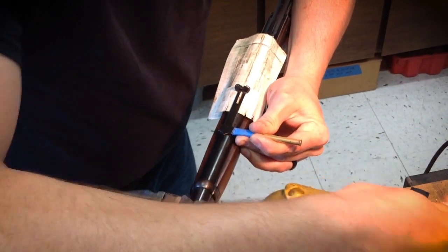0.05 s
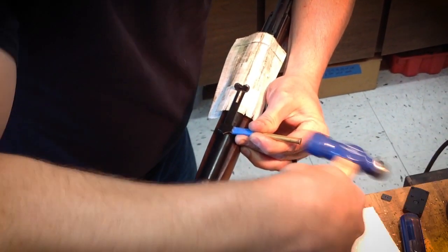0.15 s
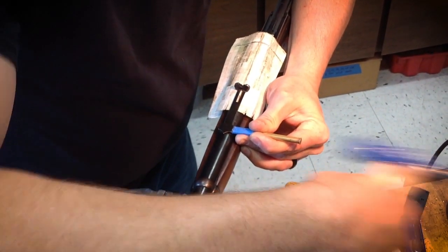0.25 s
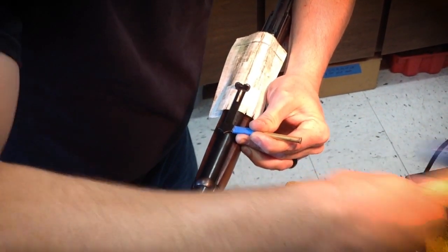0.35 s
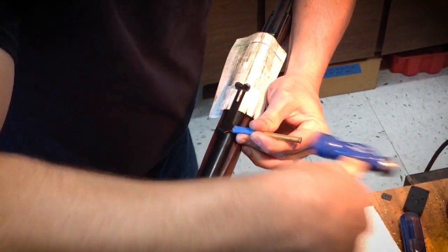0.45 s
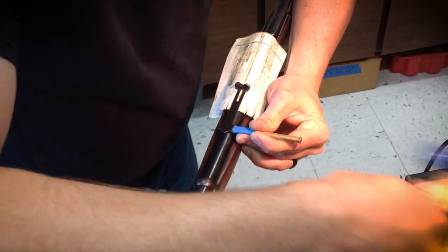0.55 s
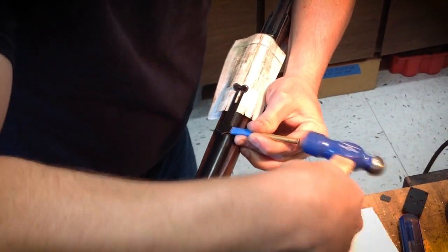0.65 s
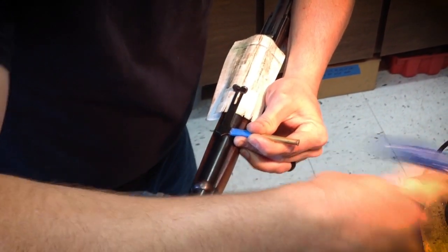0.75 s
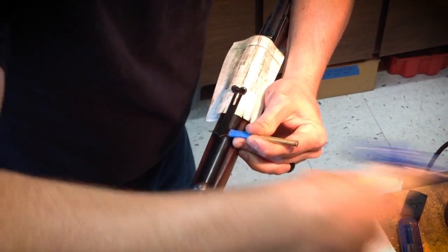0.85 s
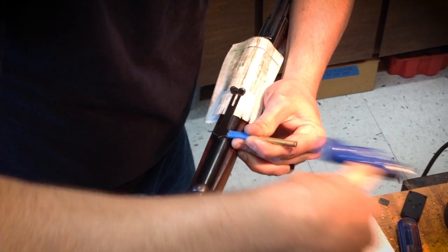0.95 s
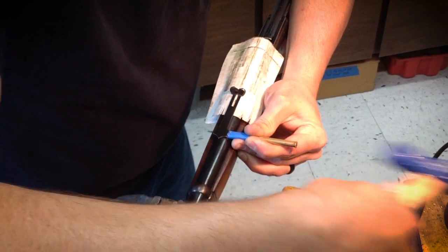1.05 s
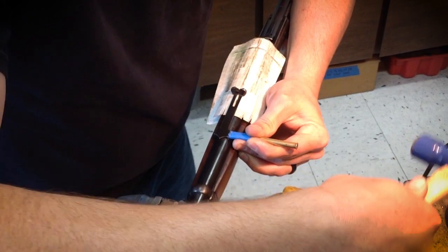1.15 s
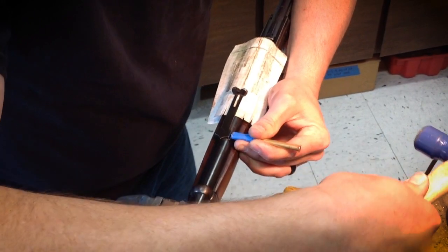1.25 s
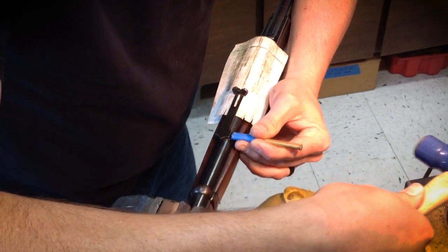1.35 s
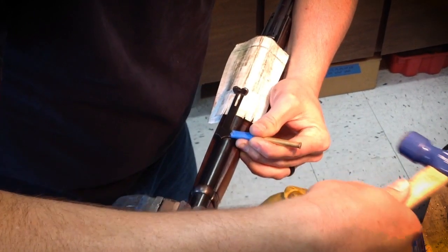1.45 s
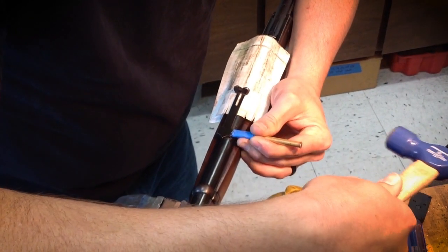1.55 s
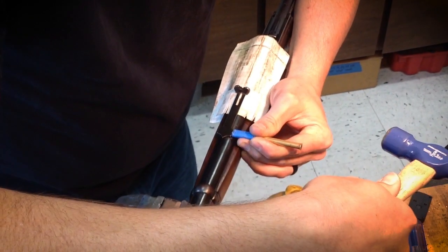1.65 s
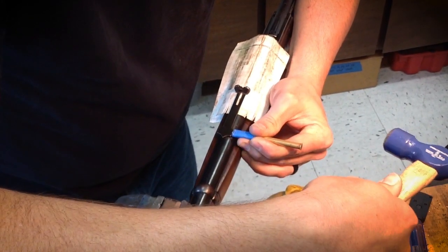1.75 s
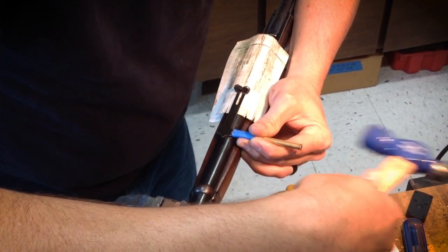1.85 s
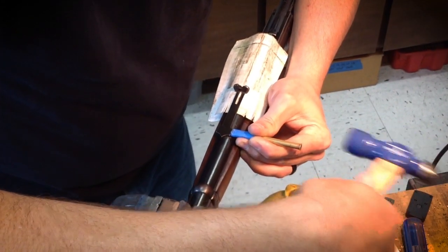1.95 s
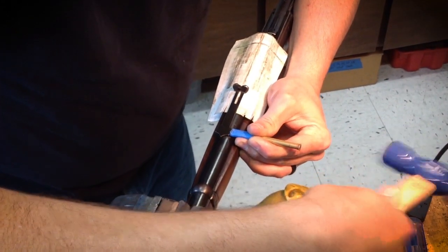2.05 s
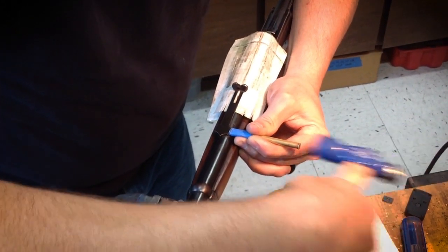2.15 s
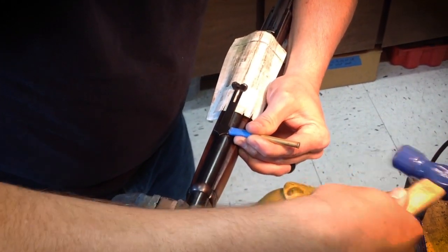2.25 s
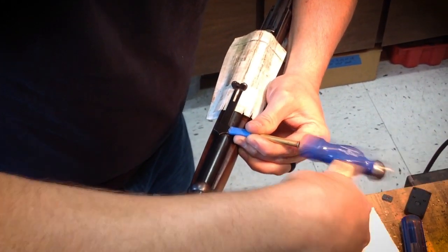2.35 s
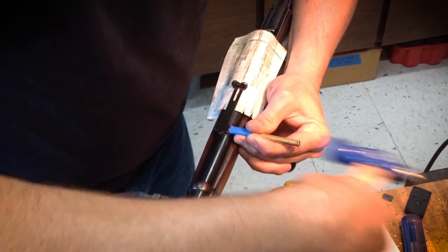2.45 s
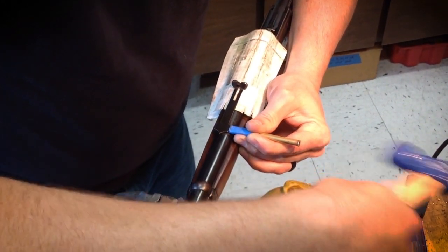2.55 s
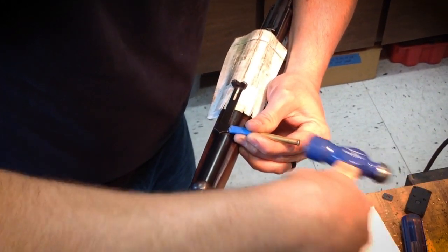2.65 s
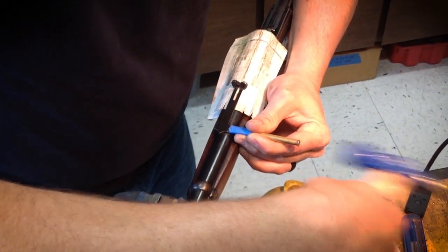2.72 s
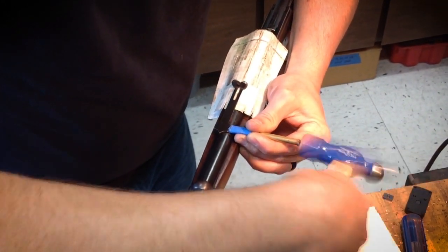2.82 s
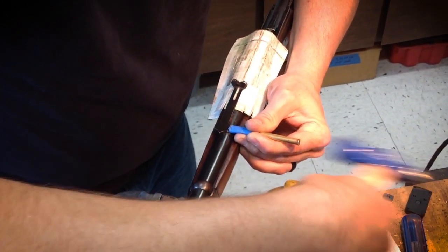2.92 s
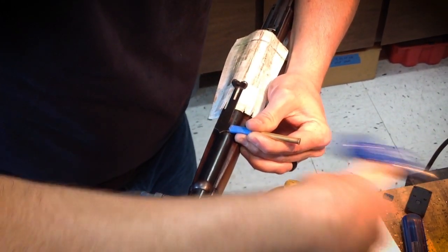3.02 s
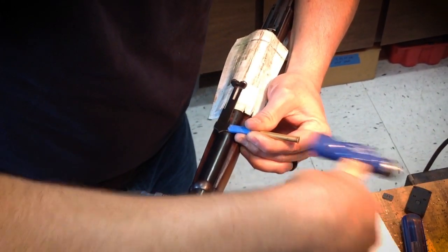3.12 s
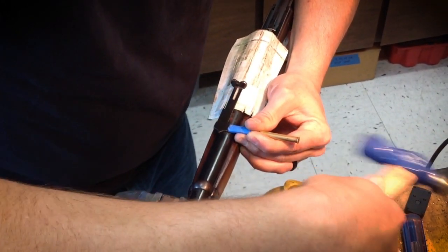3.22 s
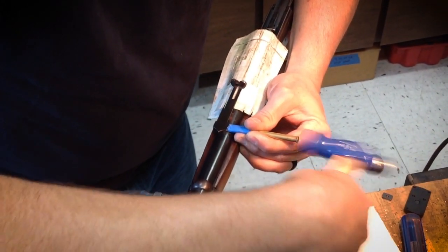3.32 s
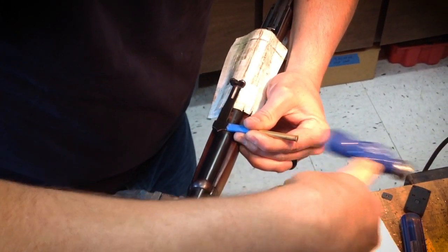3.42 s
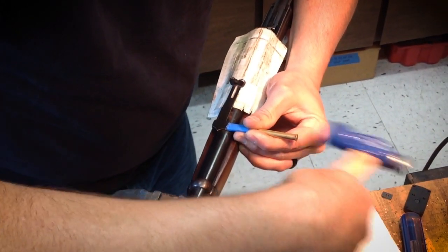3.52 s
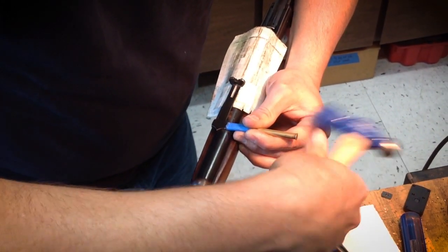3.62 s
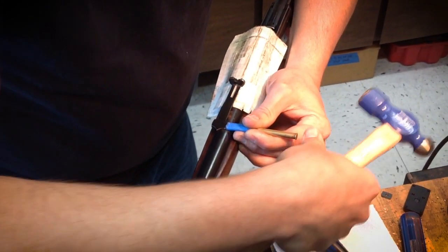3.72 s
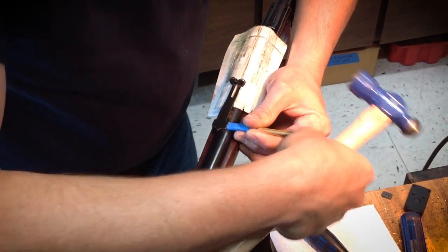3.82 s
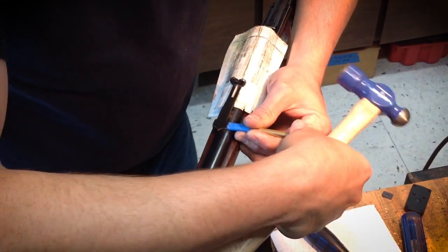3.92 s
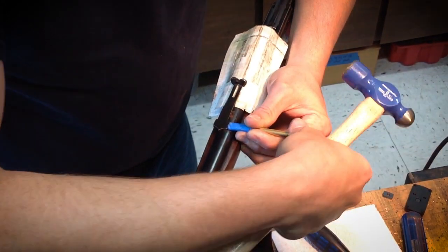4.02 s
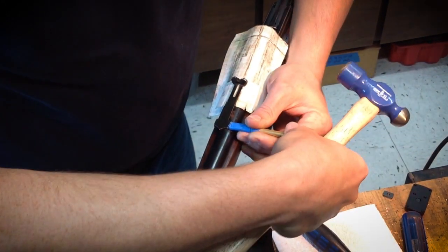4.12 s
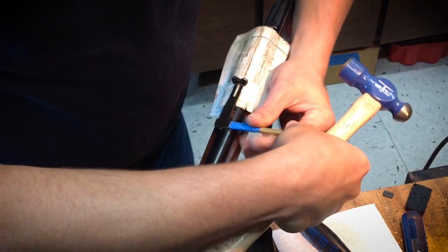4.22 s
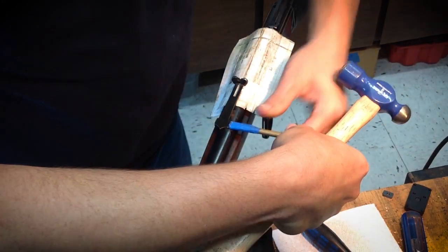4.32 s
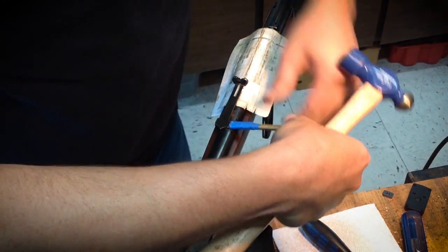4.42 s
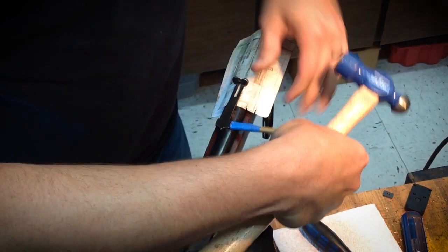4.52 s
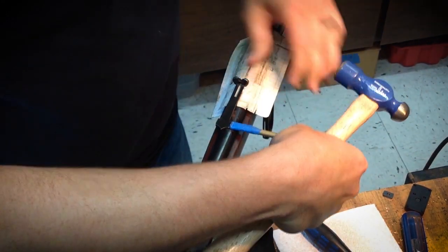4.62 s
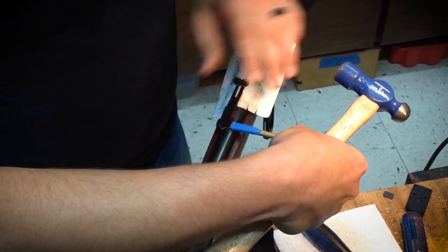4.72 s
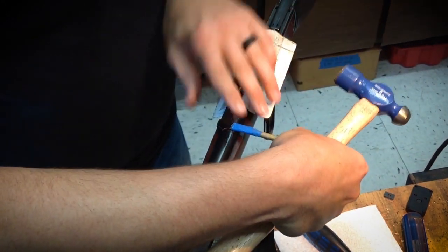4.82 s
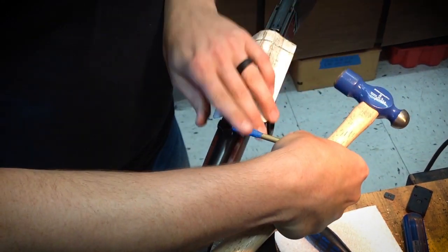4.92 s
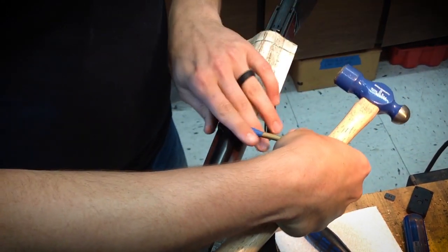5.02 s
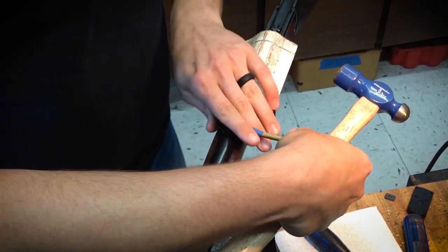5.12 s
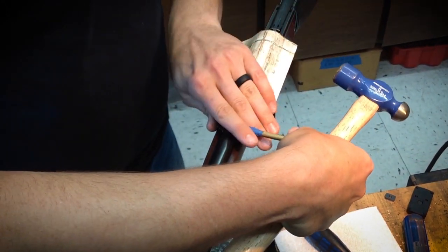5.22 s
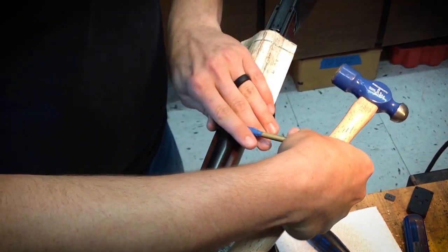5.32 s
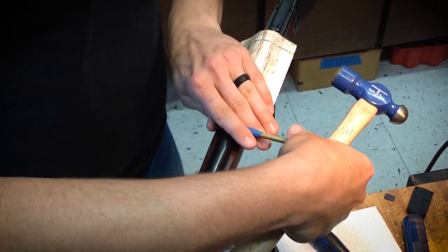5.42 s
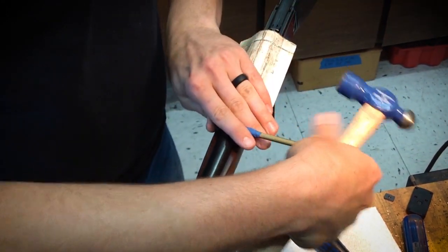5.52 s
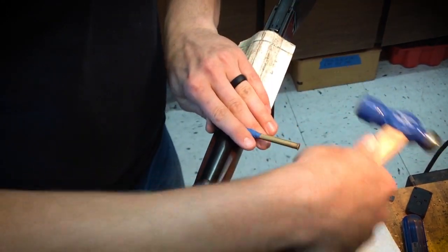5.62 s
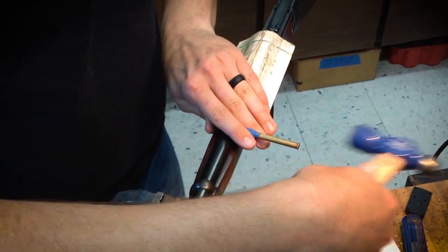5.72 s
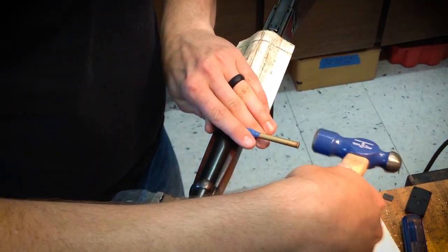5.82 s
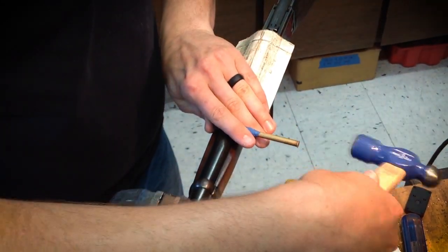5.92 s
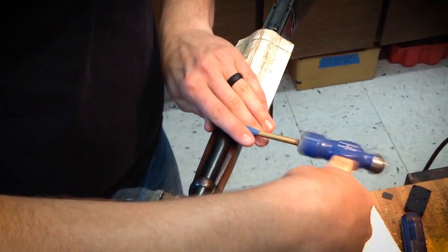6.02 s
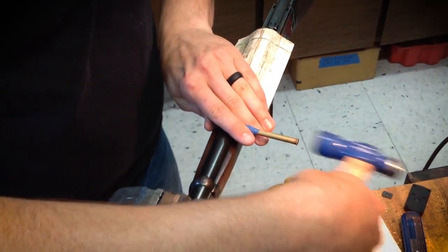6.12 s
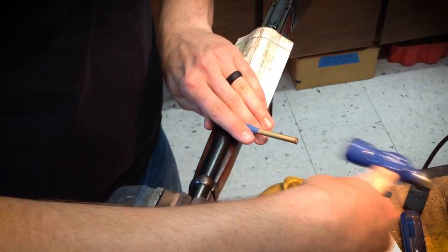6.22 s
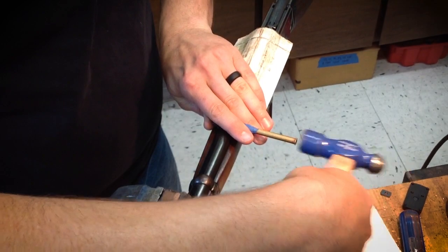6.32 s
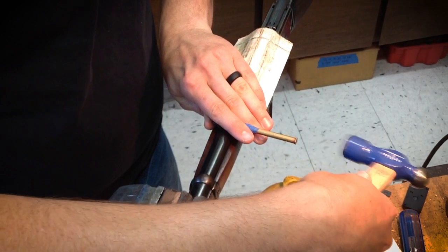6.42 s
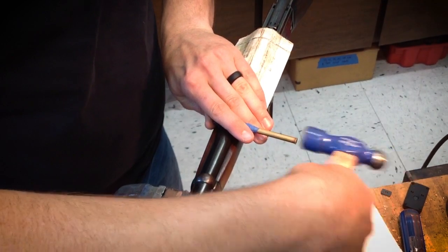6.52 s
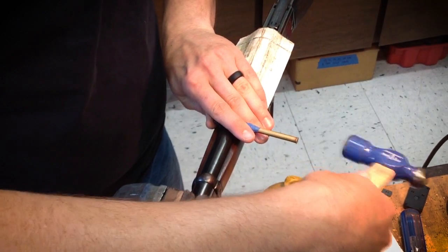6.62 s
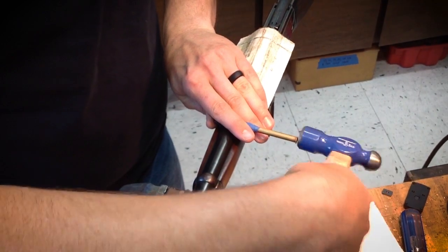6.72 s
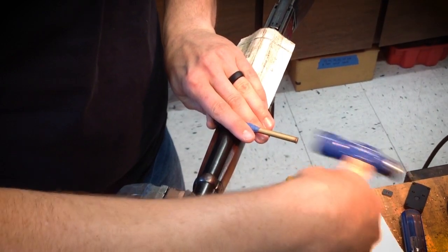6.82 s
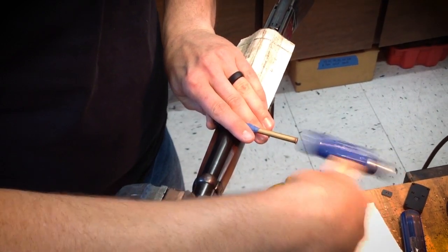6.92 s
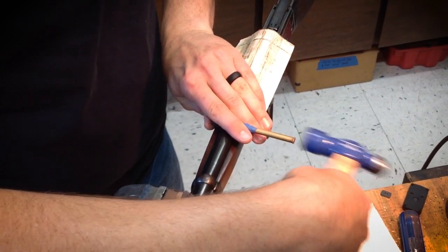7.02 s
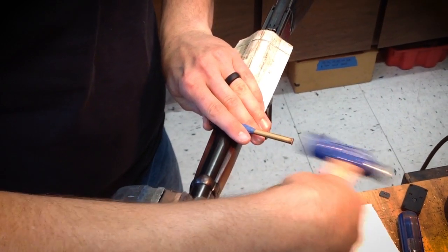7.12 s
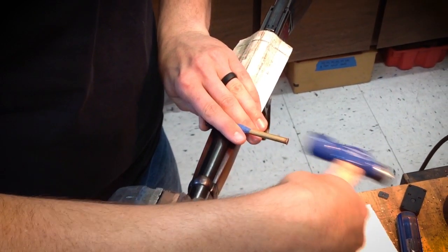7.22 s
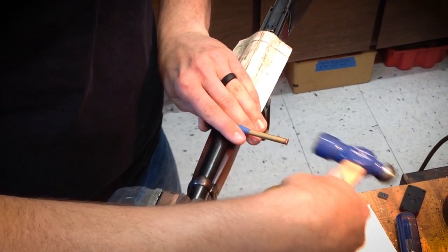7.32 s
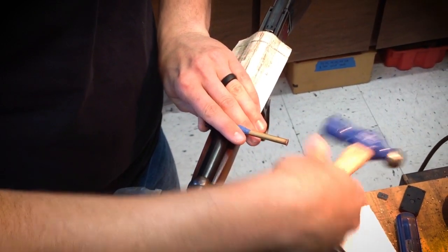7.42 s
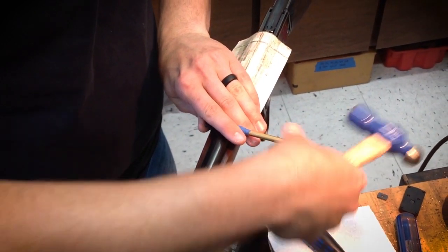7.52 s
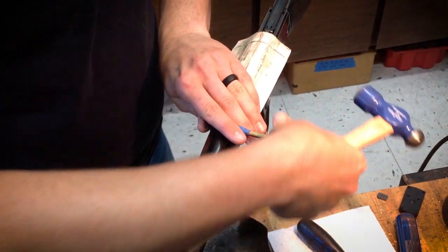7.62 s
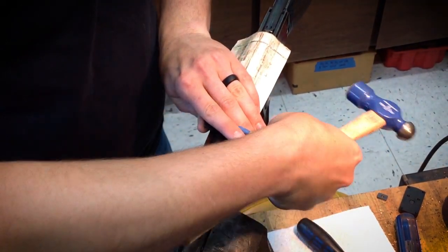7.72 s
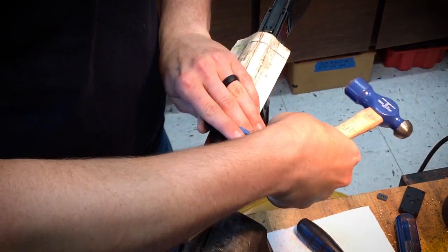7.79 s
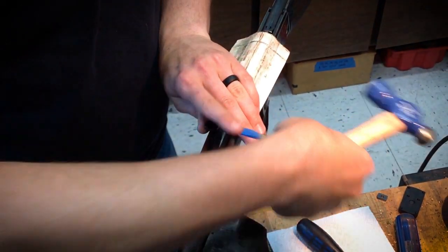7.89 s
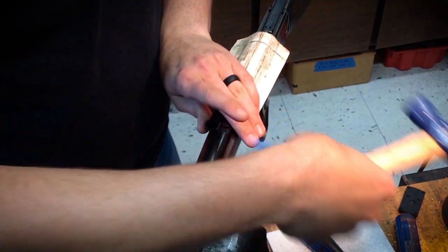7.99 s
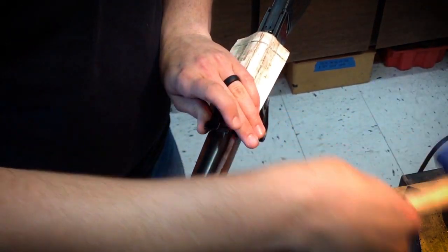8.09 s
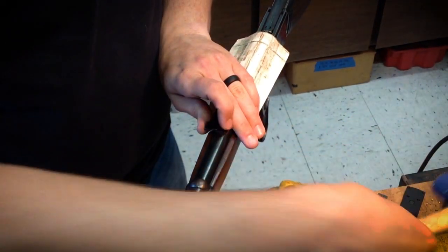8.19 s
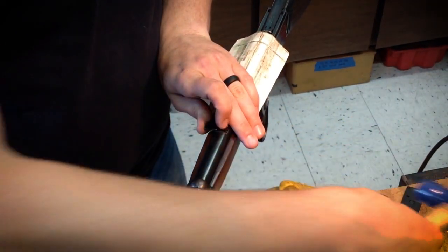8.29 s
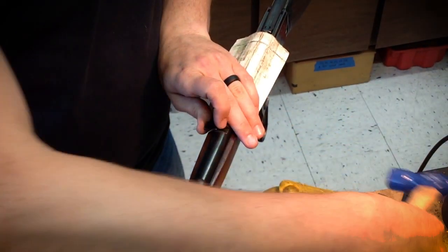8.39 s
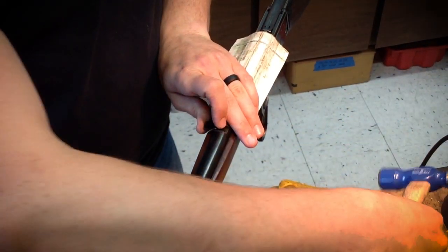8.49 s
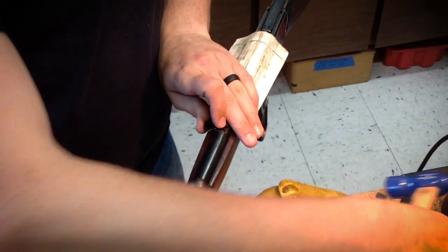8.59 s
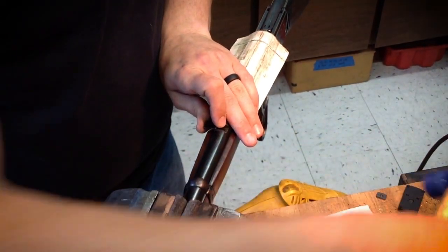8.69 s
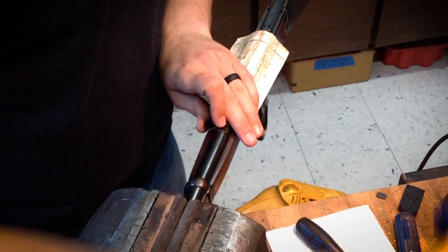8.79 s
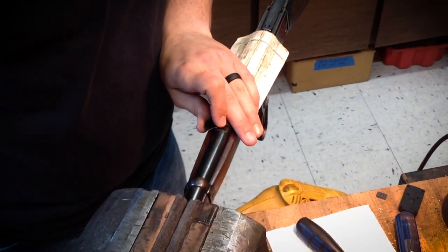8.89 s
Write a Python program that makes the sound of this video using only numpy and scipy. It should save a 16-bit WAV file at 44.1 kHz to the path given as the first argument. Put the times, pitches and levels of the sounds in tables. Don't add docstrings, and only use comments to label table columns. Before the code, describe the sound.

A hammer taps a metal punch in quick runs, four hard ringing cracks, then softer taps, clinks, gentler taps and a dull bench knock.

```python
import sys
import numpy as np
from scipy import signal
from scipy.fft import rfft, irfft, next_fast_len
from scipy.io import wavfile

SR = 44100
rng = np.random.default_rng(int(sys.argv[2]) if len(sys.argv) > 2 else 0)


def output_pcm(signal):
    pcm = np.clip(np.atleast_2d(signal).T, -1, 1) * 32767
    wavfile.write(sys.argv[1], SR, np.round(pcm).astype(np.int16))


def invert_db(x):
    u = np.asarray(x, float) / 20
    return 10 ** u


N = 394694
LEAD = SR // 10
FIRST_ECHO_S = 0.0014

# pitch_hz [Hz], t60_s [s]
ROOM_DECAY = [(100, 0.69), (260, 0.16), (700, 0.33), (1840, 0.26), (4850, 0.28), (12800, 0.18)]


def at_hz(points, hz):
    points_hz, values = np.transpose(points)
    return np.interp(np.log(hz + 1e-3), np.log(points_hz), values)


def coloured(spectrum):
    size = next_fast_len(N)
    shape = invert_db(at_hz(spectrum, np.fft.rfftfreq(size, 1 / SR)))
    x = irfft(rfft(rng.standard_normal(size)) * shape, size)[:N]
    return x / x.std()


def band_pass(x, low_hz, high_hz):
    return signal.sosfilt(signal.butter(2, [low_hz, high_hz], "band", fs=SR, output="sos"), x)


def cut_below(x, hz):
    return signal.sosfilt(signal.butter(2, hz, "high", fs=SR, output="sos"), x)


def ring_shape(hz, t60):
    t = np.arange(min(int(1.5 * t60 * SR), 2 * SR)) / SR
    return invert_db(-60 * t / t60) * np.sin(2 * np.pi * hz * t)


def strike(times, levels_db, modes, chatter_ms, spread_db, delay_ms=0.0):
    times = np.asarray(times)
    chatter_s = (chatter_ms * np.ones(len(times)) / 1000)[:, None]
    place = np.sort(rng.random((len(times), 6)), axis=1)
    place[:, 0] = 0
    contact_s = times[:, None] + delay_ms / 1000 + place * chatter_s
    at = np.round(contact_s * SR).astype(int) + LEAD
    out = np.zeros(N + 2 * LEAD + 2 * SR)
    for hz, mode_db, t60 in modes:
        share = invert_db(mode_db + spread_db * rng.standard_normal((len(times), 1)))
        contacts = rng.uniform(0.059, 1, place.shape) * (1 - 1.715 * place)
        contacts[:, 0] *= 0.6
        contacts[:, 1:] *= chatter_s > 0
        contacts /= np.sqrt(np.sum(contacts ** 2, axis=1, keepdims=True))
        forces = invert_db(levels_db)[:, None] * share * contacts
        shape = ring_shape(hz, t60)
        for i, force in zip(at.ravel(), forces.ravel()):
            if force:
                out[i:i + len(shape)] += force * shape
    return out[:N + 2 * LEAD]


def crack(times, levels_db, t60_ms, low_hz, high_hz):
    bursts = np.zeros(N + 2 * LEAD)
    t = np.arange(LEAD // 2) / SR
    swell = 1 - np.exp(-t / 0.0005)
    for s, db, ms in zip(times, levels_db, t60_ms * np.ones(len(times))):
        at = round(s * SR) + LEAD
        bursts[at:at + len(t)] += invert_db(db - 60000 * t / ms) * swell
    slips = band_pass(bursts * rng.standard_normal(len(bursts)), low_hz, high_hz)
    return slips * np.sqrt(SR / 2 / (high_hz - low_hz))


def background():
    # pitch_hz [Hz], level_db [dB per Hz]
    air = [(30, -5), (45, 1.5), (100, -5), (200, -12.5), (450, -14.5), (900, -19), (1400, -18), (2500, -24),
           (8600, -28.5), (11800, -31.5), (12300, -70)]
    # pitch_hz [Hz], level_db [dB rms]
    motors = [(52.5, -82.5), (89, -84.5), (124, -89)]
    # time_s [s], level_db [dB]
    shake = [(0.0, -50), (0.62, -42.5), (0.74, -55.5), (0.87, -36.5), (2.09, -48.5), (2.79, -41.5),
             (4.49, -53.5), (4.91, -45), (5.33, -50.5), (5.38, -45.5), (8.82, -46.5), (8.95, -47)]
    # pitch_hz [Hz], level_db [dB per Hz]
    shake_colour = [(4, -32), (7, -2.5), (10, 6), (14, 2), (19, -12), (26, -24), (36, -37.5), (50, -66.5),
                    (100, -130)]
    t = np.arange(N) / SR
    waver = invert_db(3.0 * coloured([(0.2, 0.5), (1.5, -4), (4, -39), (9, -100)]))
    hum = sum(invert_db(db - 4.5) * np.sin(2 * np.pi * hz * t) for hz, db in motors)
    rumble = invert_db(np.interp(t, *np.transpose(shake))) * coloured(shake_colour)
    return invert_db(-78) * coloured(air) + waver * hum + rumble


def stroke_level(strokes, column):
    attack_s, fade_db_per_s = 0.02, 300
    t, out = np.arange(N) / SR, np.zeros(N)
    for row in strokes:
        since = t - row[0]
        swell = np.clip(since / attack_s, 0, 1) ** 2
        out += swell * invert_db(row[column] - fade_db_per_s * np.clip(since - row[1], 0, 1))
    return out


def rustle():
    # start_s [s], length_s [s], cloth_db [dB], skin_db [dB]
    strokes = [(3.717, .15, -67, -73), (4.153, .24, -82, -83.5), (4.423, .08, -81, -79.5),
               (4.913, .18, -79.5, -85), (5.23, 0.082, -85, -92), (7.784, 0.049, -88, -78.5),
               (7.88, 0.049, -87, -88), (8.54, .05, -75, -83), (8.585, 0.036, -65.5, -68),
               (8.64, 0.018, -79, -76), (8.71, .03, -74, -76)]
    # pitch_hz [Hz], level_db [dB per Hz]
    cloth = [(1530, 1.5), (2600, 0), (2820, 7), (3750, 5), (8790, 1), (14100, -25), (15500, -30)]
    skin = [(290, -10), (500, -15), (1140, -4), (1460, -6), (1800, -2.5), (2480, -11), (2800, -18),
            (3640, -44), (6160, -120)]
    flicker = invert_db(1.5 * coloured([(20, 10), (150, -11), (400, -41.5), (900, -100)]))
    sleeves = stroke_level(strokes, column=2) * coloured(cloth)
    hands = stroke_level(strokes, column=3) * coloured(skin)
    return flicker * (sleeves + hands)


def small_contacts():
    # start_s [s], peak_db [dB]
    clinks = [
        (4.037, -27),
        (4.68, -29),
        (5.442, -44),
    ]
    # pitch_hz [Hz], level_db [dB], t60_s [s]
    clink_modes = [(199.9, -37, 0.018), (444, -19.5, .02), (895, -21, 0.081), (1123, -13.5, 0.055),
                   (1540, -9.5, 0.057), (1820, -7, 0.029), (2220, -7, 0.03), (2292, -4, 0.057),
                   (3860, -13, 0.013)]
    # start_s [s], dull_db [dB], bright_db [dB]
    ticks = [(1.479, -60, -59), (1.579, -61, -79), (4.221, -75, -68), (4.316, -85, -62), (4.379, -82, -74),
             (4.52, -72, -74), (4.929, -61, -73), (7.477, -75, -68), (7.537, -80, -62.5),
             (7.629, -78, -68.5), (7.798, -64.5, -90), (7.903, -71, -69), (8.329, -68, -81),
             (8.537, -73, -70)]
    # pitch_hz [Hz], level_db [dB], t60_s [s]
    dull_modes = [(540, -10, 0.021), (850, -12, 0.018), (1490, -4, 0.0175), (1900, -11.5, 0.013)]
    clink_s, clink_db = np.transpose(clinks)
    s, dull_db, bright_db = np.transpose(ticks)
    return (strike(clink_s, clink_db - 11.5, clink_modes, chatter_ms=0.11, spread_db=2.5)
            + crack(clink_s, clink_db - 9.5, t60_ms=18.0, low_hz=900, high_hz=2240)
            + crack(clink_s, clink_db - 36, t60_ms=6.5, low_hz=2900, high_hz=9700)
            + strike(s, dull_db + 0.5, dull_modes, chatter_ms=0.49, spread_db=4.0)
            + crack(s, bright_db + 4, t60_ms=10.0, low_hz=2300, high_hz=11000))


def knocks():
    # start_s [s], peak_db [dB]
    landings = [
        (8.61, -53),
        (8.629, -25),
        (8.948, -45),
    ]
    # pitch_hz [Hz], level_db [dB], t60_s [s]
    bench_modes = [(140, -33, 0.043), (307, -32, 0.02), (554, -22, 0.015), (847, -8.5, 0.023),
                   (1293, -6, 0.034), (1800, -20, 0.015), (2260, -17.5, 0.015)]
    s, db = np.transpose(landings)
    thud = strike(s, db - 5.5, bench_modes, chatter_ms=2.5, spread_db=1.0)
    grain = crack(s, db - 13, t60_ms=56.0, low_hz=745, high_hz=1900)
    return signal.sosfilt(signal.butter(4, 2700, fs=SR, output="sos"), thud + grain)


def workshop(x):
    t = np.arange(SR // 2) / SR
    tail = np.zeros(len(t))
    edges = 40 * 2 ** np.arange(0, 9, 0.5)
    for low, high in zip(edges, edges[1:]):
        band = band_pass(rng.standard_normal(len(t)), low, high)
        tail += band * invert_db(-60 * t / at_hz(ROOM_DECAY, np.sqrt(low * high)))
    tail *= np.clip(t / FIRST_ECHO_S, 0, 1) ** 2
    return signal.fftconvolve(x, tail / np.sqrt(np.sum(tail ** 2)))[:len(x)]


def all_taps():
    # start_s [s], face_db [dB peak], wood_db [dB shock into support], shank_db [dB], vice_db [dB thump]
    taps = [(0.2239, -0.5, -23.5, -14, -43), (0.4713, -2, -24.5, -15.5, -43), (0.7238, -1, -24, -19, -41),
            (0.9757, -2.5, -26, -19.5, -44), (2.1914, -10.5, -28.5, -24, -48),
            (2.4404, -10, -27, -23.5, -45), (2.6753, -6.5, -30, -24.5, -44),
            (2.9083, -9, -31, -25.5, -43.5), (3.1403, -11, -37.5, -30.5, -43.5),
            (3.3822, -12.5, -39.5, -35.5, -47.5), (3.6147, -20.5, -41, -37.5, -63),
            (6.1105, -16, -41.5, -42.5, -47.5), (6.3515, -15, -41.5, -37.5, -48),
            (6.564, -12.5, -44, -35, -48), (6.7815, -11, -45.5, -33, -48.5),
            (6.992, -10.5, -43.5, -32, -49), (7.198, -13.5, -48.5, -35.5, -58.5)]
    earlier = (0.5, -22.5, -16, -43)
    s, face_db, wood_db, shank_db, vice_db = np.transpose([(-0.022, *earlier)] + list(taps))
    shock_db = wood_db + 30
    tube_db = -29.5 + 0.65 * shock_db
    chatter_ms = 2.8 * invert_db(0.52 * shock_db)
    return s, face_db, wood_db, tube_db, shank_db, vice_db, chatter_ms


def hammer_tail():
    # pitch_hz [Hz], level_db [dB to the nearest body]
    room_colour = [(180, -25), (300, -10), (570, -18.5), (720, -17), (1200, -14.5), (1800, -16.5),
                   (2300, -18), (3600, -23.5), (4560, -33.5), (7300, -29), (10000, -35), (14500, -46.5)]
    # pitch_hz [Hz], level_db [dB to the first tail]
    late_colour = [(180, -25.5), (700, -22), (2000, -29), (5000, -35), (12000, -44)]
    late_t60_s = 0.85
    s, face_db, wood_db, tube_db, shank_db, *_ = all_taps()
    edges = 160 * 2 ** np.arange(0, 6.8, 1 / 3)
    white = rng.standard_normal((2, N + 2 * LEAD))
    rate = SR / 16
    at = np.ceil((s + LEAD / SR) * rate).astype(int)
    swell = np.exp(-1 / (FIRST_ECHO_S * rate))
    out = 0
    for k, (low, high) in enumerate(zip(edges, edges[1:])):
        hz = np.sqrt(low * high)
        nearest_db = [wood_db, tube_db, shank_db, face_db][np.searchsorted([950, 1900, 4000], hz)]
        blows = np.zeros(white.shape[1] // 16 + 1)
        blows[at] = invert_db(nearest_db + at_hz(room_colour, hz) + 1.8 * rng.standard_normal(len(s)))
        early = signal.lfilter([1], [1, -invert_db(-60 / (rate * at_hz(ROOM_DECAY, hz)))], blows)
        late = signal.lfilter([1], [1, -invert_db(-60 / (rate * late_t60_s))], blows)
        both = early + invert_db(at_hz(late_colour, hz)) * late
        envelope = signal.lfilter([1 - swell], [1, -swell], both)
        band = band_pass(white[k % 2], low, high)
        out = out + np.repeat(envelope, 16)[:len(band)] * band / band.std()
    return out


def hammer():
    # pitch_hz [Hz], level_db [dB], t60_s [s]
    face = [(5170, -9, .008), (6360, -14.5, 0.0056), (6644, 0.5, 0.0027), (7440, 1, 0.0049),
            (7940, 2.5, 0.0029), (8880, -5.5, 0.0053), (9170, -14, 0.0017), (11040, -13, 0.0017),
            (11610, -5, 0.0076), (12600, -6, .003), (14200, -9.5, 0.0042), (15900, -17.5, 0.003)]
    shank = [(1930, -6.5, 0.0083), (2200, 1, 0.0047), (2600, 1.5, 0.022), (2971, 1, 0.023),
             (3360, 3, 0.018), (4150, -7, 0.015), (4466, -10.5, 0.018)]
    tube = [(1135, -12, 0.19), (1180, -19, .25), (1246, -9, 0.11), (1345, 7, 0.041), (1600, 0, 0.0025)]
    wood = [(176, -26, 0.017), (230.6, -15.5, 0.049), (315, 2, 0.079), (347.6, -8.5, 0.15),
            (434, -5.5, 0.022), (483, -5, 0.011), (615.8, -5, 0.025), (770, -12.5, 0.0067), (870, -6, 0.04)]
    vice = [(54.76, -4.5, 0.24), (73, -1, 0.12), (101, 1, 0.13), (121, 2, .08), (143, 4.5, 0.11),
            (226, -4.5, 0.31), (365, -4.5, .28)]
    # pitch_hz [Hz], level_db [dB], t60_s [s]
    tube_ring = [(1138, -1, .28), (1140, 0, 0.44), (1190, -3, .26), (1255, -1, .24), (1324, -1, .2)]
    # pitch_hz [Hz], level_db [dB], t60_s [s]
    free_rings = [(754, -41, 2.2), (761, -47, 1.5), (1140, -48, 1.2), (1355, -43, 1.3), (7450, -38, .4)]
    s, face_db, wood_db, tube_db, shank_db, vice_db, chatter_ms = all_taps()
    steel = (strike(s, face_db - 7.0, face, chatter_ms, spread_db=3.5, delay_ms=0.45)
             + crack(s + 0.0002, face_db - 9.5, 12.0 + 1.9 * chatter_ms, low_hz=4030, high_hz=15000)
             + strike(s, shank_db - 2.5, shank, 1.4 * chatter_ms, spread_db=1.3, delay_ms=0.9)
             + crack(s + 0.001, shank_db + 4.5, 10.5 + 4.5 * chatter_ms, low_hz=1630, high_hz=4470)
             + strike(s, tube_db + 0.13, tube, 0.6 * chatter_ms, spread_db=2.2, delay_ms=1.4)
             + crack(s + 0.0023, tube_db + 1.5, 11.0 + 2.7 * chatter_ms, low_hz=775, high_hz=1809))
    support = strike(s, wood_db - 2.0, wood, 0.45 * chatter_ms, spread_db=0.4, delay_ms=1.6)
    return (cut_below(steel, hz=860)
            + strike(s + 0.0015, 0.45 * tube_db - 37.5, tube_ring, 0, spread_db=1.0)
            + cut_below(support, hz=190)
            + strike(s, vice_db, vice, 0, spread_db=1.13, delay_ms=0.4)
            + strike(s, wood_db + 1, free_rings, 0, spread_db=1))


def scene():
    blows, small, bench = hammer(), small_contacts(), knocks()
    room_send = invert_db(-14) * blows + invert_db(-9) * small + invert_db(-7.5) * bench
    heard = blows + hammer_tail() + small + bench + workshop(room_send)
    return (heard[LEAD:LEAD + N] + rustle() + background())[None]


def band_limit(x):
    return signal.sosfilt(signal.butter(12, 16570, fs=SR, output="sos"), x)


def record(dry):
    ceiling = 0.41
    squeezed = dry / (1 + np.abs(dry / ceiling) ** 6) ** (1 / 6)
    rolled_off = signal.sosfilt(signal.cheby2(10, 45, 16250, fs=SR, output="sos"), squeezed)
    return band_limit(rolled_off)


dry = scene()
out = record(dry)
output_pcm(out)
```